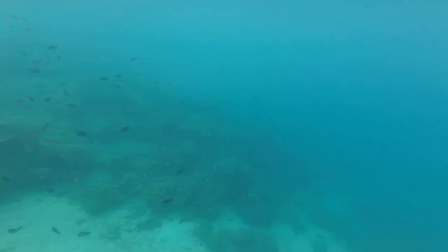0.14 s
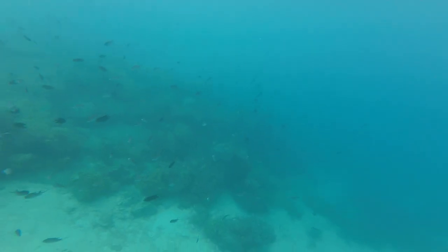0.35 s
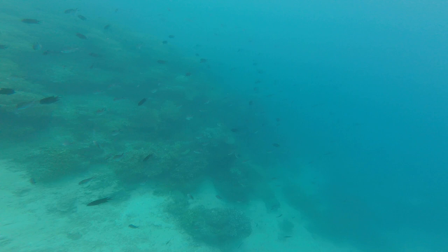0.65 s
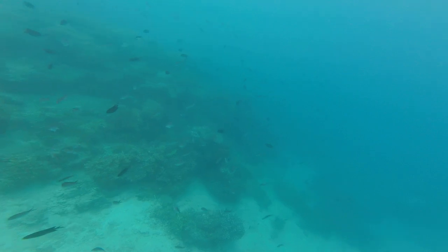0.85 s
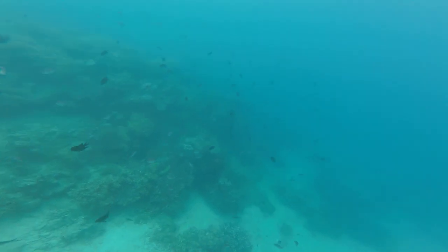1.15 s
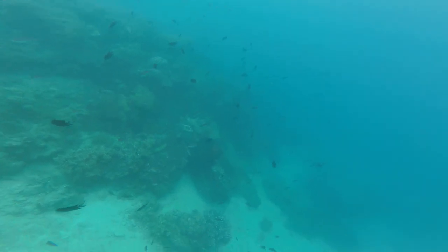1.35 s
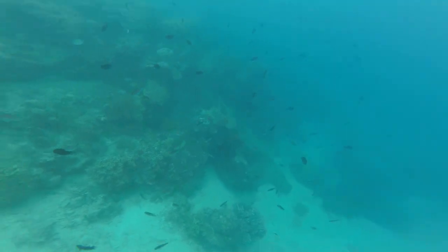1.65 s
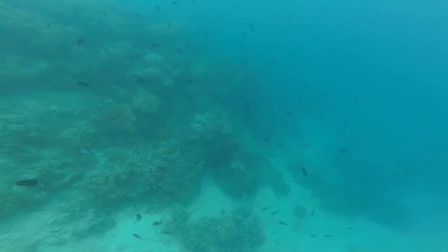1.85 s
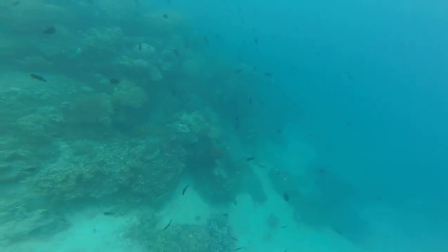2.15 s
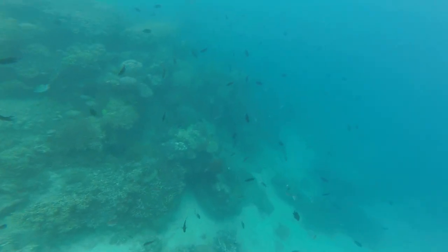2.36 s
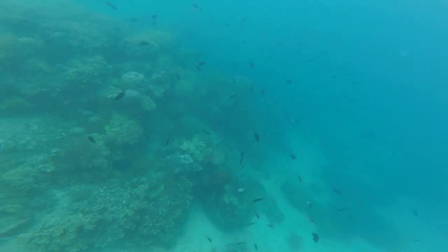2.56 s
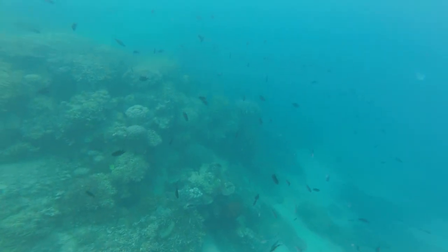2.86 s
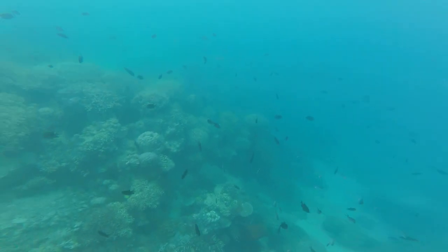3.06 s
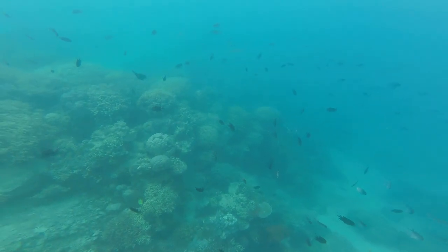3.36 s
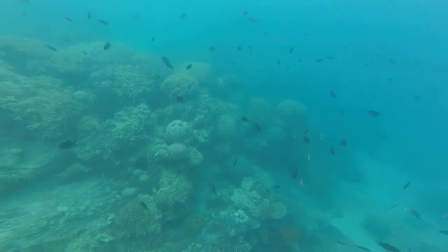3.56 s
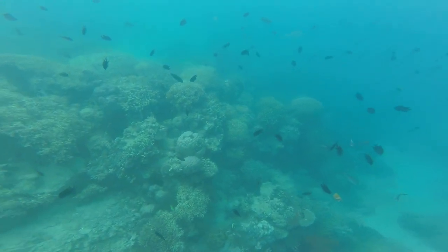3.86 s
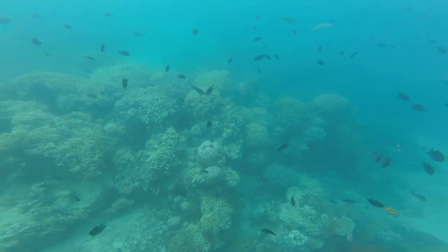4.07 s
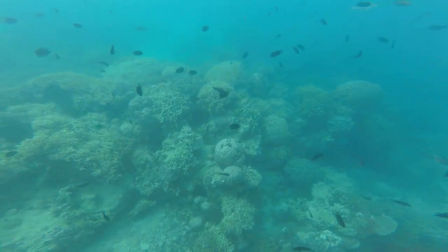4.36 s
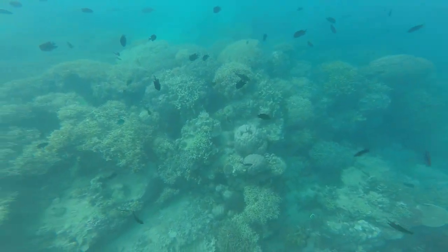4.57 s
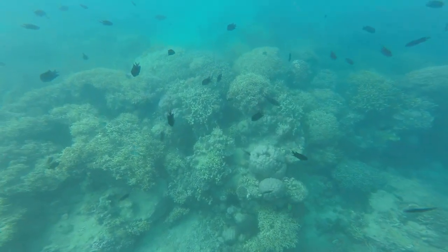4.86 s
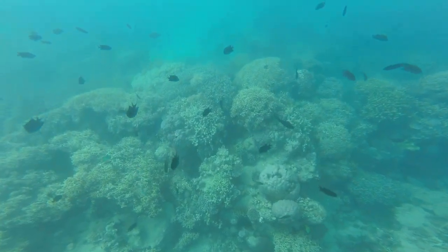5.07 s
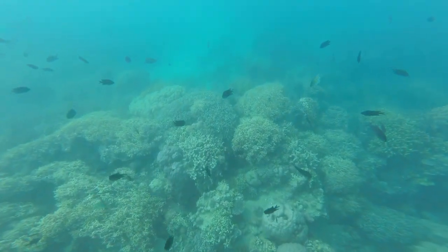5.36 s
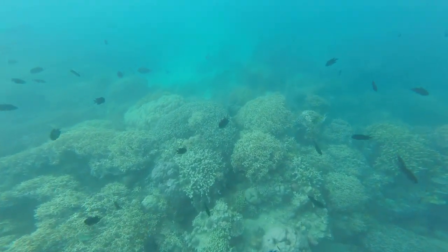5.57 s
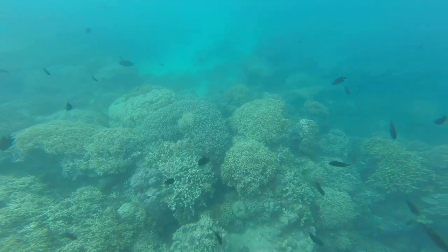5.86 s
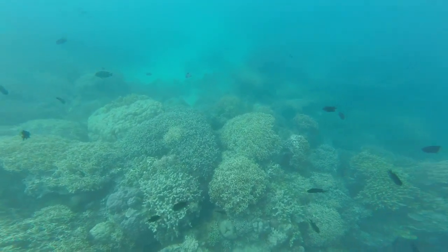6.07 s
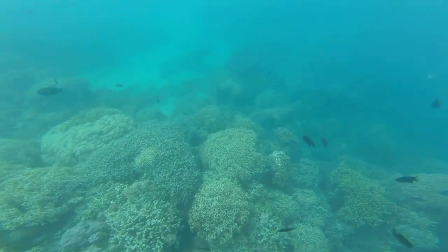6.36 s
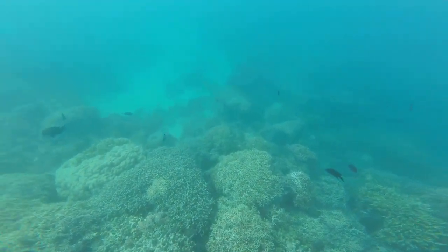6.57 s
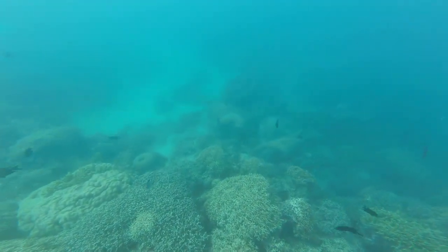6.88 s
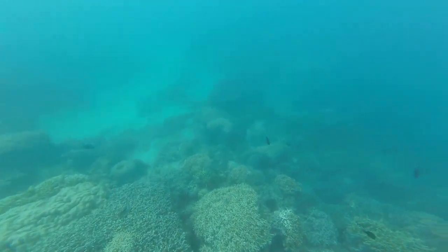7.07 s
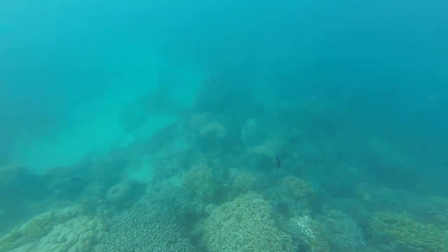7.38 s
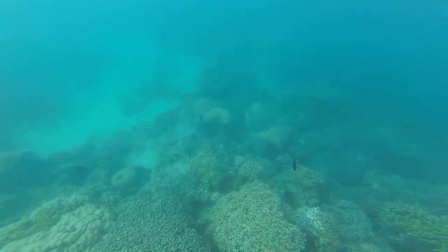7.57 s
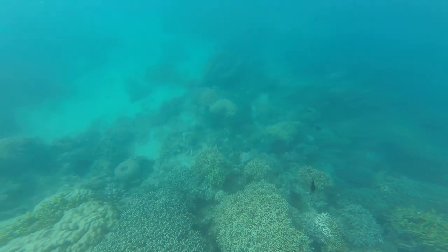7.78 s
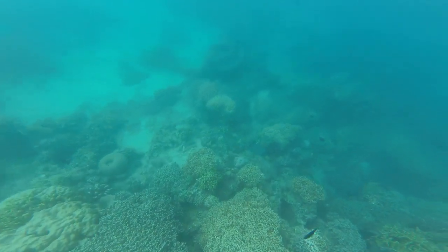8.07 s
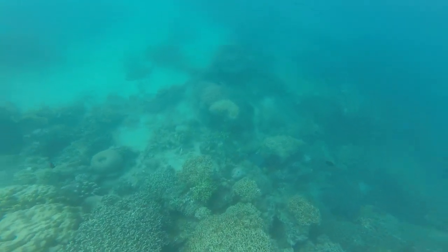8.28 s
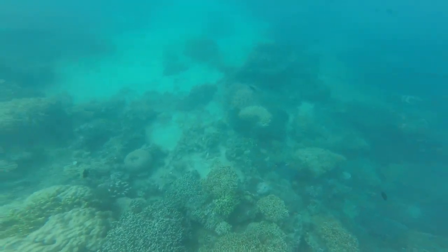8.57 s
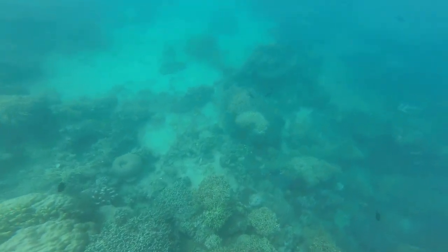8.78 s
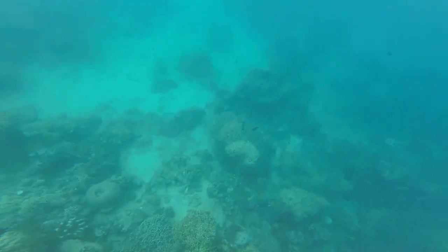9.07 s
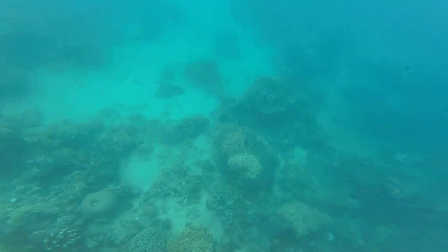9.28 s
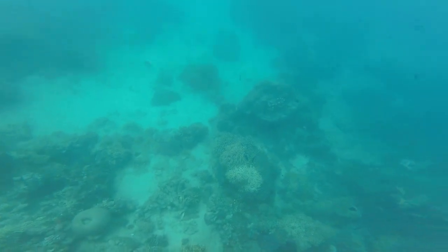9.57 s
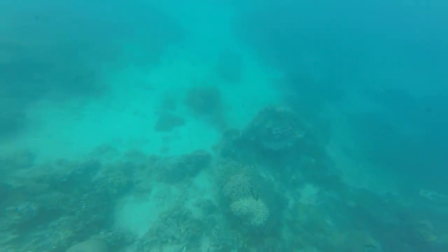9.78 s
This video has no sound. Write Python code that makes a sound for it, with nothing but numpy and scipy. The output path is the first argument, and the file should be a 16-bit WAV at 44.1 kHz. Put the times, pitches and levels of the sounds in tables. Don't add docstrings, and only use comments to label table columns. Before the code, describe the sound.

Boat engine thudding fast and muffled underwater, loose metal parts rattling, while turbulent water rumbles, buffets and gulps against a sealed camera housing.

```python
import sys
import numpy as np
from scipy import signal
from scipy.fft import rfft, irfft, next_fast_len
from scipy.io import wavfile
from scipy.ndimage import uniform_filter1d

SR = 44100
rng = np.random.default_rng(int(sys.argv[2]) if len(sys.argv) > 2 else 0)


def voltage_ratio(level):
    return 10 ** (np.asarray(level, float) / 20)


def wrap_up_sound(samples):
    columns = np.atleast_2d(samples).T
    tamed = np.clip(columns, -1, 1)
    steps = np.round(tamed * 32767).astype(np.int16)
    wavfile.write(sys.argv[1], SR, steps)


N = 437913

# f/Hz, level/(dB per Hz)
HULL_COLOUR = [(250, -34), (420, -5.5), (553, -2), (628, 2.5), (759, -1), (973, 1), (1050, 2.5),
               (1170, -12.5), (1420, -11.5), (1600, -13), (1760, -9.5), (1950, -12.5), (2525, -18.5),
               (2845, -30.5), (3265, -30.5), (4245, -48), (7170, -120)]
# t/s, nearness/dB, cover looseness/dB, plate looseness/dB
NEARNESS = [(0.0, -54.5, 14, 6.7), (0.9, -47, 9.1, 6.5), (1.57, -42.5, 11, 7), (1.96, -38.5, 10, 6.2),
            (2.25, -41.5, 9.8, 4), (3.3, -40.5, 10.1, 2.5), (3.65, -42.5, 9, 2.2), (4.3, -40, 10.7, 8.1),
            (5.9, -40, 6.8, 5.7), (6.7, -41, 6.7, 5.9), (7.4, -39.5, 7, 3), (7.8, -41, 2.5, 0.55),
            (8.3, -42, 5.7, 2.1), (9.2, -48, 6, 4.4), (9.93, -48.5, 6.6, 5.4)]


def evened(x):
    return x / np.sqrt(np.mean(x ** 2) + 1e-20)


def curve(rows):
    s, *columns = np.transpose(rows)
    return [np.interp(np.arange(N) / SR, s, c) for c in columns]


def band_noise(level_db, gate, colour, lo_hz, hi_hz, edge=.06):
    size = next_fast_len(N)
    log_hz = np.log(np.fft.rfftfreq(size, 1 / SR) + 1)
    f, colour_db = np.transpose(colour)
    rise = np.clip((log_hz - np.log(lo_hz)) / edge / 2 + .5, 0, 1)
    fall = np.clip((np.log(hi_hz) - log_hz) / edge / 2 + .5, 0, 1)
    shape = evened(voltage_ratio(np.interp(log_hz, np.log(f + 1), colour_db)) * np.sqrt(rise * fall))
    noise = voltage_ratio(level_db) * evened(gate) * rng.standard_normal(N)
    return irfft(rfft(noise, size) * shape, size)[:N]


def lumps(per_s, depth_db):
    size = max(int(SR / per_s), 1)
    smooth = uniform_filter1d(uniform_filter1d(rng.standard_normal(N), size), size)
    return voltage_ratio(depth_db * evened(smooth))


def ring(hz, rise_s, t60_s):
    t = np.arange(1500) / SR
    tone = (1 - np.exp(-t / rise_s)) * voltage_ratio(-60 * t / t60_s) * np.sin(2 * np.pi * hz * t)
    return tone / abs(tone).max()


def fuzzy(hz, width_hz):
    pole = np.exp(-np.pi * width_hz / SR)
    a, b = signal.lfilter([1], [1, -pole], rng.standard_normal((2, N)), axis=1)
    carrier = np.exp(2j * np.pi * np.cumsum(hz * np.ones(N)) / SR)
    return evened(((a + 1j * b) * carrier).real)


def wobbling_tone(hz, per_s, depth_db):
    return np.cos(2 * np.pi * np.cumsum(hz * lumps(per_s, depth_db)) / SR)


def band_pass(x, lo_hz, hi_hz):
    return signal.sosfilt(signal.butter(2, (lo_hz, hi_hz), "band", fs=SR, output="sos"), x)


def add(mix, s, sound):
    part = mix[round(s * SR):][:len(sound)]
    part += sound[:len(part)]


def blows(rows, length_s, more_db, glide=0.):
    t = np.linspace(-2.5 * length_s, 2.5 * length_s, int(5 * length_s * SR))
    shape = np.exp(-.5 * (2 * t / length_s) ** 2)
    out, left = np.zeros(N), np.ones(N)
    for s, db, hz in rows:
        tone = np.sin(2 * np.pi * hz * t * (1 + glide * t / length_s))
        add(out, s + t[0], voltage_ratio(db + more_db) * shape * tone)
        add(left, s + t[0], -.65 * shape)
    return out, np.clip(left, .15, 1)


def beat(turns, place, width, spread_db):
    since = turns - place + .5
    cycle = np.floor(since).astype(int) + 2
    size = voltage_ratio(spread_db * rng.standard_normal(200))[cycle]
    return size * np.exp(-.5 * ((since % 1 - .5) / width) ** 2)


def crank():
    # t/s, lead over steady running/cycles, unevenness of the cylinders/(0 the even pattern, 1 the full shift)
    crank_lead = [(0.0, .1, 0), (1.0, .025, -.2), (2.0, -.016, 0), (2.5, -.143, .5), (3.0, -.221, .7),
                  (3.5, -.288, .7), (4.0, -.239, 1.1), (4.5, -.112, 1.1), (5.0, -.089, 1), (6.0, -.156, .8),
                  (6.6, -.124, .5), (7.0, -.131, 0), (7.5, -.238, 1.1), (8.0, -.268, 0), (8.5, -.29, 0),
                  (9.5, -.379, .5), (9.93, -.307, .8)]
    # place in the cycle/0-1, strength/dB, shift when uneven/dB
    firing_at = (.2, .46, .71, .89)
    even_db = (0.5, 1.3, 2.5, -4.5)
    uneven_db = (-7, 1.5, -2, 1)
    # place in the cycle/0-1, level/dB
    closings = [
        (0.161, 0.5),
        (0.501, 6.5),
        (.62, 5.5),
        (0.699, 1.5),
        (0.801, 3.5),
    ]
    lead, uneven = curve(crank_lead)
    cycles_per_s = 12.1
    turns = cycles_per_s * np.arange(N) / SR + lead
    firing = sum(voltage_ratio(1.2 * (db + shift * uneven)) * beat(turns, at, 0.051, 1.5)
                 for at, db, shift in zip(firing_at, even_db, uneven_db))
    valves = sum(voltage_ratio(db) * beat(turns, at, 0.021, 2.6) for at, db in closings)
    return turns, firing, valves


def engine_orders(turns):
    # t/s, level/dB
    line_shake = [(0.0, -26), (0.5, -45), (1.0, -30), (2.0, -27), (3.0, -24), (4.0, -32), (5.0, -32.5),
                  (5.5, -25), (6.3, -29), (7.0, -26), (7.6, -24.5), (8.5, -34.5), (9.0, -43), (9.93, -43)]
    # multiple of the cycle rate, level/dB, how it follows the shake/(dB per dB)
    order_numbers = (2, 3, 4, 7)
    orders_db = (-37.5, -31, -21.5, -32.5)
    orders_follow = (1.1, 1.3, 1.8, 1.1)
    shake_db = curve(line_shake)[0] + 24
    return sum(np.sqrt(2) * voltage_ratio(db + follow * shake_db) * np.cos(2 * np.pi * k * turns)
               for k, db, follow in zip(order_numbers, orders_db, orders_follow))


def hull_firings(firing):
    # t/s, level/dB
    load = [(0.0, -37), (1.57, -29), (1.96, -24), (2.76, -26.5), (3.05, -23), (3.65, -26.5), (4.0, -24.5),
            (4.5, -22), (4.66, -27), (4.95, -24), (5.25, -26.5), (6.3, -24.5), (7.15, -28), (7.75, -23.5),
            (7.84, -27), (8.2, -26.5), (8.8, -31), (9.93, -35)]
    # t/s, peak/dB, f/Hz
    thud_rows = [(1.093, -17.5, 810), (1.594, -17, 780), (1.751, -15, 760), (1.798, -18, 830),
                 (1.828, -13, 860), (2.151, -10.5, 660), (2.364, -12, 800), (2.948, -10.5, 750),
                 (2.986, -11.5, 800), (3.055, -9.5, 636), (3.081, -13.5, 760), (3.292, -13, 860),
                 (3.377, -12, 845), (3.454, -11, 800), (3.533, -11, 696), (3.818, -13, 795),
                 (3.863, -13, 670), (3.902, -11, 815), (3.98, -9.5, 750), (4.027, -11.5, 750),
                 (4.064, -12.5, 749), (4.148, -12, 780), (4.271, -11.5, 740), (4.304, -9, 700),
                 (4.35, -6, 710), (4.432, -12, 714), (4.447, -12, 746), (4.51, -6, 730), (4.548, -11, 770),
                 (4.843, -9, 726), (4.878, -7, 784), (4.934, -9.5, 845), (4.956, -8.5, 760),
                 (5.006, -11, 785), (5.122, -7, 760), (5.357, -15, 636), (5.494, -11, 810),
                 (5.585, -12, 686), (5.673, -8.5, 734), (5.753, -8.5, 730), (5.858, -13.5, 770),
                 (6.086, -9.5, 830), (6.17, -15, 825), (6.206, -12, 850), (6.252, -12, 750),
                 (6.414, -9, 770), (6.497, -8.5, 770), (6.725, -12, 660), (7.33, -13.5, 627),
                 (7.435, -22, 790), (7.523, -12.5, 685), (7.584, -9, 675), (7.599, -8, 700),
                 (7.743, -10, 690), (7.769, -9, 740), (7.78, -10.5, 727), (8.061, -13.5, 830),
                 (8.315, -13, 655), (8.363, -12.5, 806), (8.781, -19, 780)]
    # t/s, peak/dB, f/Hz
    knock_rows = [(0.069, -17.5, 965), (0.292, -29.5, 960), (0.707, -24, 980), (0.861, -27, 1080),
                  (1.946, -12, 1030), (1.981, -10, 950), (2.037, -13, 1050), (2.281, -19.5, 930),
                  (2.365, -15, 1013), (2.545, -13.5, 1000), (2.613, -17, 990), (2.871, -18, 1090),
                  (2.965, -9.5, 960), (3.021, -12.5, 1010), (3.346, -15, 960), (3.554, -18, 960),
                  (5.023, -17, 1070), (5.476, -15, 960), (5.51, -17, 920), (5.64, -19, 1030),
                  (5.656, -14, 985), (5.95, -17, 1000), (6.127, -22, 940), (6.185, -11.5, 920),
                  (6.432, -22.0, 920), (7.079, -19, 910), (2.702, -16, 959), (7.521, -17, 1030),
                  (7.611, -16, 970), (7.907, -21, 1030), (8.23, -20, 960), (7.753, -15, 1003),
                  (8.313, -18, 1010), (8.382, -20, 920), (9.229, -16.5, 940)]
    thuds, thud_left = blows(thud_rows, 0.0051, -1.8, 0.044)
    knocks, knock_left = blows(knock_rows, 0.0054, -5.0)
    thud_db = curve(load)[0] - .6
    tick_db = curve(NEARNESS)[0]
    lingering = uniform_filter1d(firing, size=900)

    gate = (.55 + .9 * lingering) * thud_left * lumps(30, 1.8)
    rumble = band_noise(thud_db - 1.0, gate, HULL_COLOUR, 521, 898, 0.069)
    deck_db = -33.5 + 0.76 * (tick_db + 40.5) + 0.03 * (thud_db + 23.0)
    gate = (0.9 + 0.8 * lingering) * knock_left * lumps(8, 1.3)
    rumble += band_noise(deck_db, gate, HULL_COLOUR, 775, 1150)
    gate = (0.58 + 0.97 * lingering) * lumps(22, 3.4)
    rumble += band_noise(thud_db - 9.0, gate, HULL_COLOUR, 280, 560, 0.17)

    ring_hz = 817 - 15 * np.arange(N) / SR
    panel = wobbling_tone(ring_hz, 60, .6)
    boom = voltage_ratio(thud_db - 6.5) * evened((lingering + firing) * thud_left * panel)
    return thuds + knocks + rumble + boom


def loose_cover(gate, valves):
    # t/s, peak/dB, f/Hz
    rattle_rows = [(0.461, -22.5, 1480), (0.591, -21.5, 1540), (0.633, -23, 1520), (0.683, -16.5, 1430),
                   (0.711, -20, 1520), (0.794, -21.5, 1550), (0.883, -19, 1490), (0.909, -23, 1520),
                   (1.018, -21, 1500), (1.132, -24, 1580), (1.548, -24, 1510), (1.625, -18, 1450),
                   (1.653, -20, 1490), (1.984, -15, 1490), (2.165, -17, 1500), (2.447, -13, 1500),
                   (2.463, -18, 1440), (2.535, -21, 1370), (2.634, -17, 1540), (2.671, -14, 1450),
                   (2.95, -14.5, 1460), (3.198, -21, 1450), (3.273, -15.5, 1390), (3.366, -18, 1430),
                   (3.381, -18, 1600), (3.436, -18.5, 1390), (3.67, -21, 1370), (3.835, -20, 1400),
                   (3.925, -17, 1360), (4.011, -16.5, 1420), (4.079, -18, 1370), (4.242, -17, 1330),
                   (4.423, -15, 1390), (4.487, -15, 1360), (4.572, -14, 1420), (4.793, -19, 1480),
                   (5.169, -20, 1420), (5.356, -17, 1400), (5.432, -15, 1360), (5.519, -20, 1410),
                   (5.75, -17, 1380), (6.153, -15.5, 1400), (6.168, -18, 1480), (6.34, -19, 1460),
                   (6.392, -18, 1420), (6.416, -20, 1430), (6.809, -20, 1480), (7.152, -19.5, 1490),
                   (7.176, -20, 1490), (7.325, -15, 1490), (7.45, -17.5, 1450), (7.771, -24, 1550),
                   (8.256, -22, 1452), (9.618, -24.5, 1420), (9.776, -21, 1480)]
    # t/s, f/Hz
    cover_tone = [
        (0.0, 1503),
        (2.8, 1483),
        (3.4, 1418),
        (6.5, 1425),
        (7.2, 1505),
        (9.93, 1483),
    ]
    rattles, left = blows(rattle_rows, 0.0064, -3.4, .01)
    tick_db, looseness_db, _ = curve(NEARNESS)
    level_db = tick_db + looseness_db
    cover_hz = curve(cover_tone)[0]
    buzz = band_pass(fuzzy(cover_hz, 70), 1200, 2000)
    clatter = voltage_ratio(level_db - 6.5) * evened(gate) * left * buzz
    clatter += band_noise(level_db - 2.5, gate * left * lumps(71, 2.6), HULL_COLOUR, 1154, 1690)
    chirp = wobbling_tone(cover_hz, 70, 0.35)
    clatter += voltage_ratio(level_db - 10.0) * evened(valves * left * lumps(11, 4.5) * chirp)
    return rattles + clatter


def loose_plate(gate, firing, valves):
    # t/s, peak/dB, f/Hz
    clank_rows = [(0.213, -26, 1760), (1.042, -20, 1780), (1.287, -23, 1800), (1.43, -23, 1800),
                  (1.711, -19, 1920), (1.772, -22, 1840), (1.945, -18, 1760), (1.968, -16, 1730),
                  (2.022, -23, 1900), (2.042, -20, 1840), (2.108, -19, 1780), (2.363, -23, 1760),
                  (2.398, -20, 1970), (2.446, -19, 1710), (2.671, -17, 1850), (3.514, -24, 1720),
                  (4.198, -22, 1750), (4.354, -22.0, 1750), (4.369, -20, 1720), (4.424, -19, 1690),
                  (4.449, -18.5, 1740), (4.507, -23, 1830), (4.772, -18, 1760), (4.798, -18, 1780),
                  (4.926, -14.5, 1740), (4.461, -18, 1790), (4.978, -17, 1760), (5.23, -20, 1780),
                  (5.408, -24, 1810), (5.426, -19, 1750), (5.525, -21, 1820), (5.672, -20, 1700),
                  (5.739, -17, 1700), (5.756, -16.5, 1694), (6.036, -18, 1810), (6.326, -22, 1850),
                  (6.566, -21, 1730), (6.647, -21, 1720), (6.81, -22, 1740), (6.827, -22, 1760),
                  (6.911, -17, 1700), (7.053, -23, 1700), (7.202, -20, 1840), (7.393, -24, 1770),
                  (7.51, -23, 1790), (9.253, -26, 1840), (9.328, -20.5, 1790)]
    clanks, left = blows(clank_rows, .006, -3.6)
    tick_db, _, looseness_db = curve(NEARNESS)
    level_db = tick_db + looseness_db
    buzz = band_pass(fuzzy(1755, 80), 1500, 2200)
    clatter = voltage_ratio(level_db - 9.5) * evened(gate) * left * buzz
    clatter += band_noise(level_db - 1.5, gate * left * lumps(61, 1.9), HULL_COLOUR, 1680, 2136)
    chirp = wobbling_tone(1770, 70, 0.33)
    strikes = (valves + .4 * firing) * left * lumps(12, 4.5)
    clatter += voltage_ratio(level_db - 9) * evened(strikes * chirp)
    return clanks + clatter


def valve_ticks(valves):
    gate = (1.1 + 0.86 * valves) * lumps(76, 0.78)
    return band_noise(curve(NEARNESS)[0] - .35, gate, HULL_COLOUR, 2122, 3604)


def engine(turns, firing, valves):
    gate = 5.3 + 1.5 * firing + 0.34 * valves
    parts = loose_cover(gate, valves) + loose_plate(gate, firing, valves)
    return engine_orders(turns) + hull_firings(firing) + parts + valve_ticks(valves)


def gusts():
    # start/s, hold/s, strength/dB, lean to the bass/dB
    gust_rows = [(0.0, 0.42, -33, -5.5), (1.096, 0.29, -30.5, 6), (1.644, 0.17, -27.5, 6.5),
                 (2.016, 0.15, -22, -3), (2.65, 0.26, -22, -1.5), (3.207, 0.056, -28.5, 6.5),
                 (3.41, 0.065, -24, 2.5), (3.558, 0.055, -31.5, -5), (4.019, 0.31, -31.5, 2),
                 (4.445, .5, -29, 2), (5.154, 0.22, -20.5, -3.5), (5.955, 0.061, -21, -2.5),
                 (6.12, .12, -26.5, -5), (6.304, 0.14, -21, 1), (6.819, 0.18, -27.5, 2.5),
                 (7.149, 0.17, -37.5, -2.5), (7.5, 0.21, -30, 5.5), (7.867, 0.36, -18.5, -1.5),
                 (8.329, 0.36, -21, 2), (8.771, 0.11, -24, -10.5), (8.908, .22, -19.5, 2),
                 (9.31, .4, -27.5, 3.5), (9.79, .14, -24.5, 2)]
    # calm level/dB, gust level/dB, share of the lean
    calm_db = (-29, -35.5, -38.5)
    gust_db = (-1.13, -0.78, -3.5)
    lean_share = (1, 0, 0.065)
    t = np.arange(0, N + 200, 200) / SR
    start, hold, db, lean_db = np.transpose(gust_rows)[:, :, None]
    rise_db_per_s, fall_db_per_s = 200.5, 46.5
    shape_db = db - rise_db_per_s * np.maximum(start - t, 0)
    shape_db = shape_db - fall_db_per_s * np.maximum(t - start - hold, 0)
    levels = []
    for calm, more, share in zip(calm_db, gust_db, lean_share):
        power = voltage_ratio(2 * calm) + voltage_ratio(2 * (shape_db + more + share * lean_db)).sum(0)
        levels.append(np.interp(np.arange(N) / SR, t, 10 * np.log10(power)))
    return levels


def flow():
    # t/s, level/dB
    tow_pull = [(0.0, -55), (0.55, -28), (0.75, -39), (1.1, -25.5), (3.5, -25), (7.2, -30), (7.47, -28.5),
                (9.13, -25), (9.35, -33.5), (9.93, -29)]
    # f/Hz, level/(dB per Hz)
    flow_colour = [(3.5, -43), (6.0, -8.5), (37, 5.5), (140, -0.5), (322, -6.5), (409, -10), (470, -10),
                   (700, -16), (910, -47), (1540, -120)]
    # t/s, peak/dB, f/Hz
    thump_rows = [(1.686, -14, 100), (1.825, -13.5, 174), (2.162, -11.5, 190), (2.685, -14, 100),
                  (2.783, -12, 104), (3.192, -14, 95), (3.488, -6.5, 90), (3.546, -13, 86),
                  (5.177, -10, 223), (5.473, -18, 179), (5.98, -11.5, 102), (6.326, -9.5, 178),
                  (8.093, -9, 190), (8.51, -9.5, 118), (8.668, -12, 201), (8.921, -7, 167),
                  (9.83, -13, 182)]
    # t/s, peak/dB, f/Hz
    gulp_rows = [(0.184, -18, 420), (1.826, -12, 804), (2.024, -10, 354), (2.177, -6, 646),
                 (0.478, -10, 450), (3.421, -5, 464), (4.31, -7.5, 475), (4.614, -2, 316), (4.735, -9, 467),
                 (5.225, -7, 364), (5.574, -6, 513), (5.771, -7, 527), (6.144, -5.5, 333), (2.714, -6, 354),
                 (5.082, -8, 705), (5.62, -13, 520), (7.492, 0, 654), (7.657, -3.5, 680), (6.721, -5, 657),
                 (8.381, -7, 510), (6.75, -10, 320), (6.898, -7.5, 344), (7.714, -6.5, 420),
                 (7.992, -3, 344), (7.897, -10, 272), (8.084, -10, 285), (8.103, -10, 330),
                 (8.552, -3, 271), (9.193, -11, 340), (9.249, -12, 337), (8.295, -8, 318), (8.862, -6, 229),
                 (9.065, -8, 242)]
    surge_db, buffet_db, rush_db = gusts()
    thumps, calm = blows(thump_rows, 0.011, -2)
    gulps, _ = blows(np.add(gulp_rows, [.006, 0, 0]), 0.0092, -9.5, .06)
    eddies = lumps(39, 1.42)
    swings = band_noise(curve(tow_pull)[0] + 0.89, lumps(8, .6), flow_colour, 5, 52)
    surge = band_noise(surge_db - .6, calm * lumps(45, 1.0), flow_colour, 52, 130)
    buffeting = band_noise(buffet_db - .3, eddies * calm, flow_colour, 130, 277)
    rush = band_noise(rush_db + 0.15, eddies * lumps(21, 0.64), flow_colour, 278, 541, 0.15)
    return swings + thumps + surge + buffeting + gulps + rush


def shrimp(firing, valves):
    # f/Hz, level/(dB per Hz)
    crackle_colour = [(3510, -5.5), (3910, -9.5), (5010, -9.5), (5910, -12.5), (6453, -1.5), (7010, -6),
                      (8210, -12), (9610, -21.5), (10210, -36), (12810, -35.5)]
    # t/s, level/dB
    reef = [
        (0.06, -80),
        (1.42, -66),
        (1.86, -64),
        (3.74, -67),
        (4.37, -64.5),
        (8.17, -65),
        (9.1, -79),
        (9.86, -80),
    ]
    # t/s, dull crack peak/dB, housing ring peak/dB, bright crack peak/dB
    snaps = [(0.2014, -78, -60, -72), (0.381, -59, -58, -66), (0.9942, -63, -62, -54),
             (1.4465, -44, -49, -54), (1.6504, -69, -48, -60), (1.8342, -44, -50.5, -48.5),
             (2.1386, -65, -47, -51.5), (2.6794, -65, -44.5, -47), (2.8491, -41, -42.5, -57),
             (2.947, -53, -51, -58.5), (2.9839, -48.5, -55, -55), (3.5345, -55.5, -52, -51),
             (4.0588, -55, -46, -55.5), (4.2559, -57, -48, -63), (4.4728, -38.5, -44, -48),
             (4.7567, -56, -47, -54), (5.241, -59, -48, -55.5), (5.912, -57, -44, -45.5),
             (6.0584, -53, -49, -58), (6.3892, -68, -44, -45), (6.5985, -50, -43.5, -58),
             (6.8273, -35.5, -33, -46.5), (8.2557, -61, -44.5, -53), (8.313, -41, -42.5, -58),
             (8.633, -54.5, -51, -50), (8.6706, -52, -51, -60), (8.9362, -51, -71, -63.5),
             (9.0884, -48, -55, -66), (9.0961, -34, -55, -47.5), (9.1528, -57, -59, -70)]
    clicks_per_s = 900
    clicks = voltage_ratio(6.2 * np.minimum(rng.exponential(1, N), 3)) * (rng.random(N) < clicks_per_s / SR)
    fizz = 2.1 + .5 * firing + 0.37 * valves
    gate = (0.74 + 0.99 * clicks) * fizz * lumps(40, 1.4)
    bed = band_noise(2 + curve(reef)[0], gate, crackle_colour, 3850, 12450)
    for s, dull_db, ring_db, bright_db in snaps:
        add(bed, s, voltage_ratio(dull_db + 3.5) * ring(4000, .0001, .0014))
        add(bed, s, voltage_ratio(ring_db + 2.0) * ring(6560, .00041, 0.0063))
        add(bed, s, voltage_ratio(bright_db + 2.5) * ring(8300, .0003, .0018))
    return bed


def taps():
    # t/s, peak/dB, f/Hz
    tap_rows = [(0.256, -27, 2330), (0.5277, -24.5, 2270), (1.4706, -23, 2620), (1.7714, -13, 2320),
                (1.817, -18.5, 2190), (1.8755, -13, 1700), (2.837, -23, 2210), (6.8253, -18, 2226),
                (6.828, -30, 2930), (8.2545, -27, 2780), (8.313, -18, 2070), (8.81, -23, 2170),
                (9.136, -33, 2350), (9.147, -30, 2150)]
    out = np.zeros(N)
    for s, db, hz in tap_rows:
        rings = ring(.95 * hz, .0012, .013)
        rings = rings + .8 * ring(1.1 * hz, .001, .006) + .4 * ring(.8 * hz, .001, .006)
        add(out, s, voltage_ratio(db - 4) * rings)
    return signal.sosfilt(signal.butter(4, 3400, fs=SR, output="sos"), out)


def scene():
    turns, firing, valves = crank()
    return (engine(turns, firing, valves) + flow() + shrimp(firing, valves) + taps())[None]


def band_limit(x):
    return signal.sosfilt(signal.butter(12, 12800, fs=SR, output="sos"), x)


def record(dry):
    squeezed = 1.3 * np.tanh(dry / 1.3)
    top = signal.sosfilt(signal.butter(4, 3800, "high", fs=SR, output="sos"), dry - squeezed)
    return band_limit(squeezed + top)


dry = scene()
out = record(dry)
wrap_up_sound(out)
```